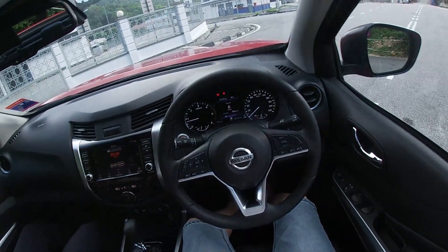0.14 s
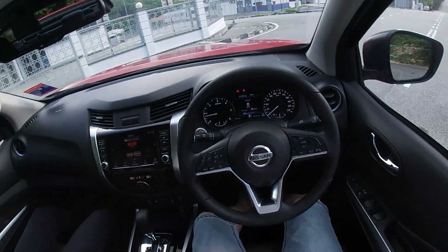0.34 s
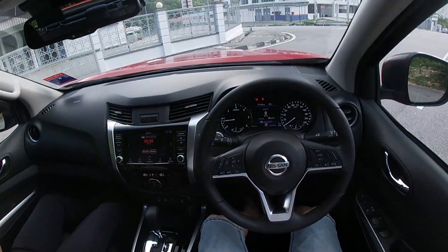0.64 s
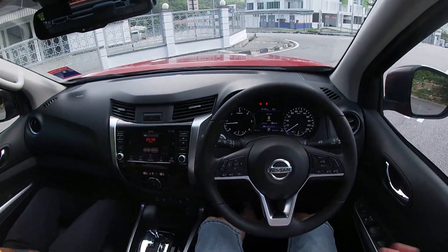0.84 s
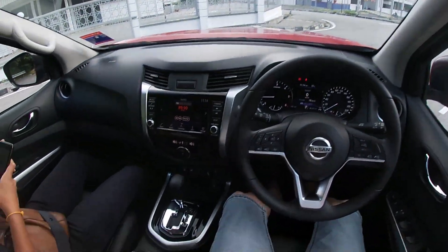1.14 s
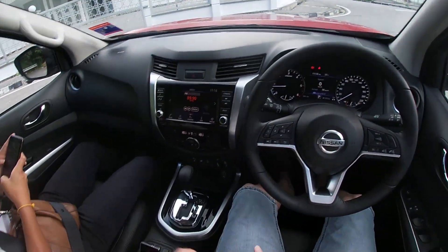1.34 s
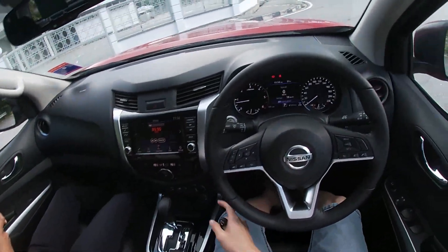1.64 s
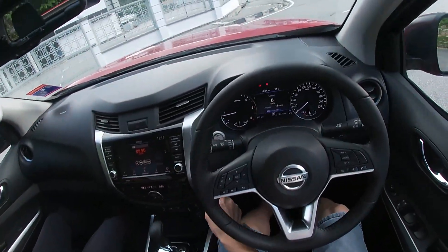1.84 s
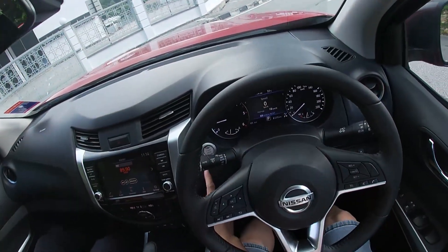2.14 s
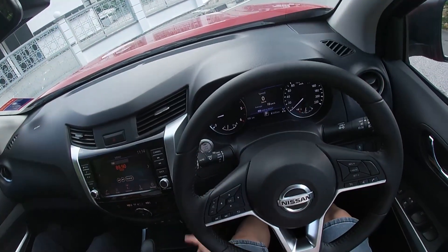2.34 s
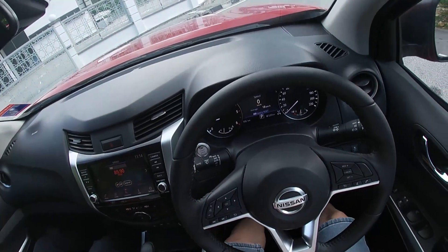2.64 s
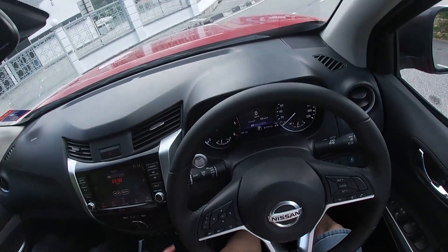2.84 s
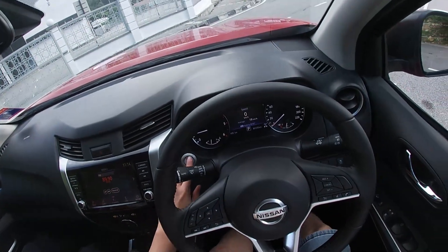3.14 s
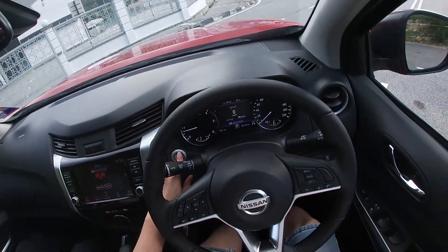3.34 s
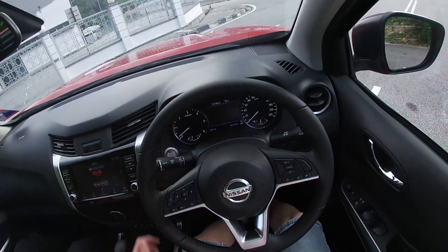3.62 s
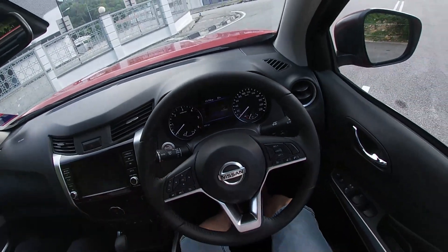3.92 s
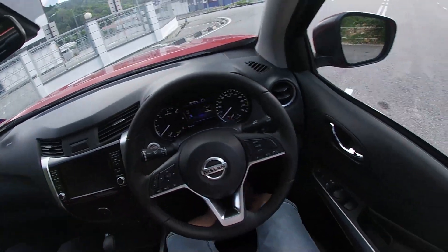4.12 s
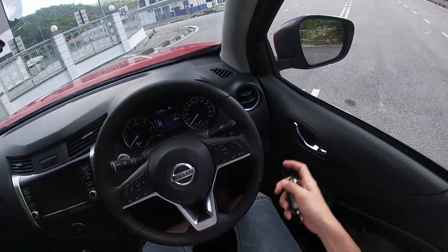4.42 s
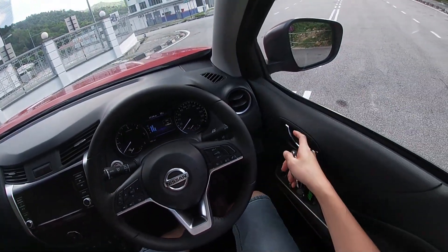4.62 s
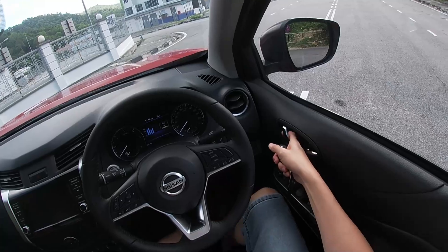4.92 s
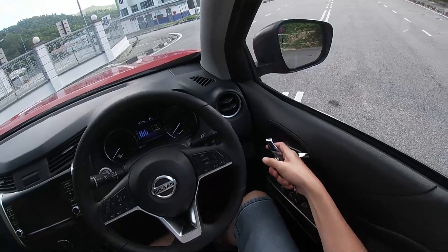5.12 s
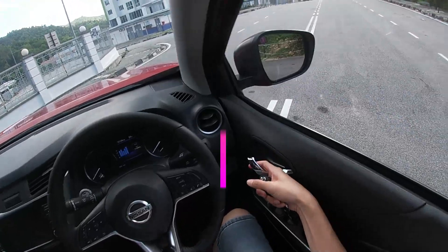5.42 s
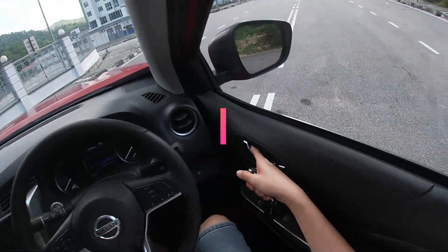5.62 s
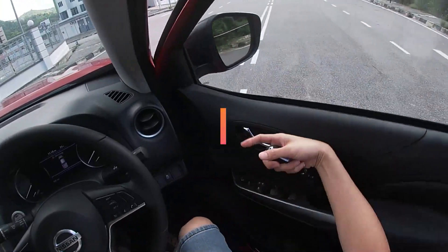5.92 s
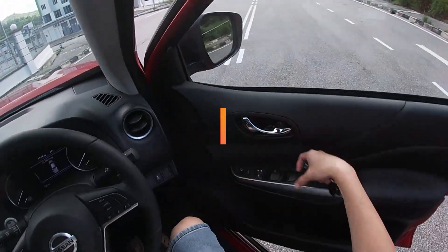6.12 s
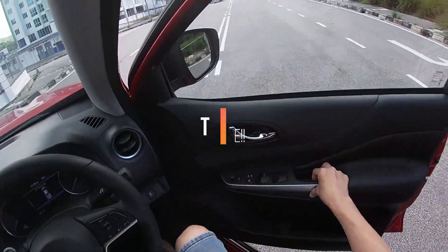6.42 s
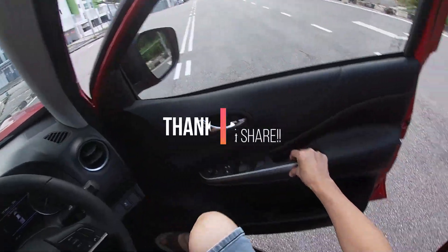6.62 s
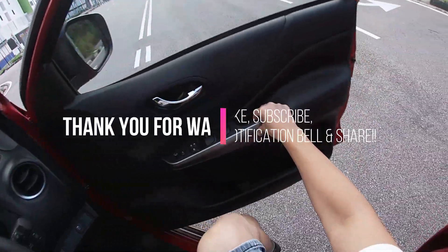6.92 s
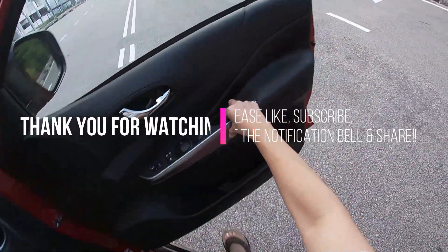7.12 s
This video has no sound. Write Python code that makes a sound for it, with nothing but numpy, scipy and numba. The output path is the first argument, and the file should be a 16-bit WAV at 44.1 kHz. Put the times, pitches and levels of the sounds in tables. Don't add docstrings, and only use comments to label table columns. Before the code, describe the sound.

A low diesel idle hums under clicks and shifter knocks, stops, then a door thuds open with a brief hinge squeak and wind.

```python
import sys
import numpy as np
from scipy import signal
from scipy.fft import rfft, irfft, next_fast_len
from scipy.io import wavfile
from scipy.ndimage import uniform_filter1d
from numba import njit

SR = 44100
rng = np.random.default_rng(int(sys.argv[2]) if len(sys.argv) > 2 else 0)


def transcribe(signal):
    frames = np.atleast_2d(signal).T
    limited = np.clip(frames, -1, 1)
    pcm = np.round(limited * 32767).astype(np.int16)
    wavfile.write(sys.argv[1], SR, pcm)


def boost_factor(decibels):
    exponent = np.asarray(decibels, float) / 20
    return 10 ** exponent


N = 320607


def level(x, db):
    return x * boost_factor(db) / np.sqrt(np.mean(x ** 2))


def curves(table):
    s, *columns = np.transpose(table)
    t = np.arange(N) / SR
    inside = 1. * ((t >= s[0]) & (t <= s[-1] + 1 / SR))
    return [np.interp(t, s, c) for c in columns], uniform_filter1d(inside, 800)


@njit
def resonance(x, hz, width):
    y, b, l = np.empty(len(x)), 0., 0.
    g, k = np.tan(np.pi * hz / SR), width / hz
    for i in range(len(x)):
        v = (b + g * (x[i] - l)) / (1 + g * (g + k))
        b = 2 * v - b
        l = l + 2 * g * v
        y[i] = k * v
    return y


def colour(x, points):
    hz, db = np.transpose(points)
    n = next_fast_len(2 * len(x))
    gain_db = np.interp(np.log(np.fft.rfftfreq(n, 1 / SR) + 1), np.log(hz), db)
    cep = irfft(gain_db * np.log(10) / 20, n)
    cep[1:n // 2] *= 2
    cep[n // 2 + 1:] = 0
    return irfft(rfft(x, n) * np.exp(rfft(cep)), n)[:len(x)]


def band(lo_hz, hi_hz, n=N):
    sos = signal.butter(2, [lo_hz, hi_hz], "bandpass", fs=SR, output="sos")
    return level(signal.sosfilt(sos, rng.standard_normal(n)), 0)


def walk(rate):
    k = int(SR / rate)
    return level(uniform_filter1d(np.repeat(rng.standard_normal(N // k + 1), k), k)[:N], 0)


def add(out, s, x):
    i = int(s * SR)
    out[i:i + len(x)] += x[:N - i]


def swell(start, length, attack, release):
    t = np.arange(N) / SR - start
    return boost_factor(20 * np.minimum(np.minimum(t / attack, (length - t) / release), 0))


def ring_down(t, t60):
    return np.exp(-np.log(1000) * t / t60)


def struck(t, t60, rise_s):
    return ring_down(t, t60) * (1 - np.exp(-t / rise_s))


def sine(hz, t):
    return np.sin(2 * np.pi * hz * t)


# frequency in Hz, density in dB per Hz.
TOP_SPECTRUM = [(7000, -40), (9000, 0.5), (11000, -6.5), (13000, -15.5), (15500, -21)]


def top_air(db):
    return level(colour(rng.standard_normal(N), TOP_SPECTRUM), db)


# time in seconds, twice the firing rate in Hz, cabin boom in dB.
IDLE = [
    (0.0, 51.08, -27),
    (0.34, 50.84, -26.5),
    (1.8, 50.85, -29),
    (2.2, 50.34, -37),
    (3.61, 50.25, -36),
    (3.76, 51.6, -32),
    (3.86, 50.85, -52),
]
# multiple of the firing rate, level in dB.
BODY_ORDERS = [(1, -1.5), (2, -2.5), (3, 0), (4, -12.5), (5, -19), (6, -26), (7, -10.5), (8, -29),
               (9, -36.5), (10, -33.5), (11, -43), (12, -35.5), (13, -45.5), (14, -29.5)]
CYLINDER_DB = [0.4, -1, 0.76, -1.1]
# frequency in Hz, width in Hz.
MOUNT_BANDS = [(110, 83)]
# frequency in Hz, density in dB per Hz.
CLATTER_SPECTRUM = [(53, -41), (90, -2.5), (183, -9), (274, -18), (306, -13), (328, -23), (572, -21.5),
                    (810, -29.5), (2500, -42.5), (3250, -56), (5500, -120)]
# frequency in Hz, width in Hz, level in dB.
DASH_MODES = [(550, 160, -9.5), (1239, 26, -8.5), (760, 47, -10)]


def engine():
    (boom_hz, boom_db), on = curves(IDLE)
    off_s = np.maximum(np.arange(N) / SR - 3.61, 0)
    hum_db = -34.5 - 110 * off_s
    clatter_db = -46.5 - 80 * off_s
    turn = np.cumsum(np.r_[np.full(SR, boom_hz[0]), boom_hz] / 2 / SR) + 0.21
    fired = np.flatnonzero(np.diff(np.floor(turn)))
    uneven_db = 0.95 * rng.standard_normal(N // 500)[:len(fired)]
    pulses = np.zeros(N + SR)
    pulses[fired] = boost_factor(np.resize(CYLINDER_DB, len(fired)) + uneven_db)

    orders = [(24.93 * k, db) for k, db in BODY_ORDERS]
    hum = colour(pulses, [(18.6, -31.0)] + orders + [(900, -71.5), (4000, -130), (20000, -190)])
    for hz, width in MOUNT_BANDS:
        hum = hum - 2 * resonance(hum, 1. * hz, 1. * width)
    boom = resonance(resonance(pulses, 48.65, 4.5), 50.4, 6.4)

    burst = 3.0 + np.exp(-(turn[SR:] % 1) / 0.96)
    hiss = colour(burst * rng.standard_normal(N), CLATTER_SPECTRUM)
    dash = sum(level(resonance(hiss, 1. * f, 1. * w), db) for f, w, db in DASH_MODES)
    clatter = level(hiss, 0) + 0.16 * dash

    out = level(hum[SR:], 1.74) * boost_factor(hum_db)
    out = out + level(boom[SR:], -0.28) * boost_factor(boom_db)
    return on * (out + level(clatter, 5.1) * boost_factor(clatter_db))


# frequency in Hz, density in dB per Hz.
CLOTH_SPECTRUM = [(820, -33), (1300, -0.5), (1570, -3), (2220, -6.5), (2950, -3), (3430, -4), (4200, -6),
                  (4960, -4.5), (6220, -4.5), (6810, -5), (8470, -14.5), (11000, -32), (18600, -120)]
# start in seconds, length in seconds, level in dB.
RUBS = [(0, 0.04, -64.5), (0.191, .45, -66.5), (0.795, 0.044, -54), (0.904, 0.043, -65.5),
        (0.993, 0.074, -53.5), (1.13, 0.058, -70), (1.36, 0.28, -64.5), (1.727, 0.38, -63),
        (2.15, 0.41, -68), (3.945, 0.32, -75.5), (4.362, 0.23, -68), (4.728, 0.51, -65.5),
        (5.87, 0.11, -66)]
# start in seconds, length in seconds, level in dB.
STROKE = [
    (2.58, 0.523, -56),
]


def rustle():
    touch = boost_factor(-67) * swell(0, 6.16, 1, 0.022)
    touch = touch + sum(boost_factor(db) * swell(s, hold, 0.046, 0.052) for s, hold, db in RUBS)
    stroke = sum(boost_factor(db) * swell(s, hold, 0.0133, 0.0133) for s, hold, db in STROKE)
    cloth = colour(rng.standard_normal(N) * boost_factor(1.1 * walk(60)), CLOTH_SPECTRUM)
    patches = np.zeros(N)
    for hz in 1493.0 * 1.3 ** np.arange(7):
        patches += boost_factor(3 * walk(12)) * resonance(resonance(cloth, hz, 0.47 * hz), hz, .5 * hz)
    hiss = level(cloth, -1.9) + level(patches, -7.5) + top_air(-23)
    thin = hiss - 0.39 * resonance(hiss, 1500.0, 1700.0)
    return touch * hiss + stroke * thin


# start in seconds, length in seconds, start pitch in Hz, end pitch in Hz, level in dB.
WHINES = [(.265, .08, 1050, 950, -52.5), (1.02, .06, 3240, 3370, -57), (3.535, .03, 1445, 1390, -50),
          (3.78, 0.081, 1340, 1300, -70), (3.924, .025, 1490, 1406, -49), (3.924, 0.014, 4530, 4410, -56),
          (5.075, 0.023, 785, 820, -55), (5.572, 0.088, 419, 488, -49), (5.63, .065, 558, 600, -52),
          (6.18, .035, 420, 378, -45.5), (6.222, .07, 689, 669, -52.5), (6.275, .06, 1950, 1910, -59),
          (6.22, 0.05, 3410, 3370, -60), (6.385, 0.022, 4900, 4850, -58), (5.475, 0.044, 658, 649, -48.5),
          (5.475, 0.027, 1390, 1360, -53), (6.345, .02, 3700, 3700, -48), (5.905, .06, 2600, 2950, -62)]
# start in seconds, length in seconds, start pitch in Hz, end pitch in Hz, level in dB.
SCUFFS = [(.085, .03, 320, 300, -44), (1.122, .04, 850, 1050, -42), (3.69, .08, 350, 220, -48),
          (1.025, .055, 1300, 1700, -50), (1.155, .04, 3500, 5000, -54), (3.515, .045, 7400, 8100, -64),
          (3.592, 0.028, 7600, 7300, -64), (3.622, 0.026, 7200, 6100, -55), (3.52, .04, 4500, 4000, -60),
          (3.66, 0.046, 2200, 2800, -46), (5.112, .045, 1300, 1100, -50), (5.185, .05, 1300, 1450, -56),
          (5.285, .05, 500, 800, -42), (5.115, 0.059, 420, 380, -45), (6.176, .04, 1500, 1300, -51),
          (5.735, 0.058, 400, 520, -42), (2.58, .17, 5200, 4800, -60.5), (2.79, .18, 5200, 7000, -60.5),
          (2.95, .06, 3600, 3500, -60.5), (3.0, .11, 7000, 7500, -59), (3.03, .075, 9800, 10000, -80),
          (2.6, .12, 3200, 3100, -63), (.03, .025, 4800, 4500, -42), (1.15, .045, 9000, 9500, -66),
          (4.235, .04, 400, 300, -48), (4.365, .05, 420, 300, -44), (3.93, .14, 800, 700, -62),
          (3.555, .04, 6500, 6000, -62), (5.69, .04, 700, 600, -52)]


def slides():
    out = np.zeros(N)
    for rows, width in (WHINES, .08), (SCUFFS, .7):
        for start, length, start_hz, end_hz, db in rows:
            n = int(length * SR)
            chance = rng.standard_normal((3, SR // 4))
            k = max(int(SR / (width * start_hz)), 2)
            a, b = uniform_filter1d(uniform_filter1d(chance[:2], k, axis=1), k, axis=1)[:, :n]
            rough = uniform_filter1d(uniform_filter1d(chance[2], 90), 90)
            grain = boost_factor(4.0 * level(rough, 0)[:n])
            phase = 2 * np.pi * np.cumsum(np.linspace(start_hz, end_hz, n)) / SR
            rub = a * np.cos(phase) + b * np.sin(phase)
            add(out, start, level(rub * grain * np.hanning(n) ** 0.55, db))
    return out


# time in seconds, peak in dB, ring in Hz, body part in dB.
BRAKE = [
    (.0309, -18.5, 3000, 7.5),
    (.0792, -42, 2140, 9),
    (.0917, -31, 2100, -18),
    (.3774, -26, 2680, 5.5),
]
SHIFTER = [
    (.823, -41, 6460, 10),
    (.8462, -18, 3400, -29),
    (.8819, -27.5, 3000, 11.5),
    (.9702, -26, 3460, -21),
    (.9909, -25.5, 2130, 1),
    (1.0844, -23, 2590, 11),
    (1.1506, -32.5, 6170, 7),
    (1.1675, -31, 2880, -11.5),
    (1.1782, -31.5, 3470, -12),
    (1.281, -48.5, 2330, 5),
]
BUCKLE = [
    (1.4076, -30, 3160, -12),
    (1.565, -29, 3050, -24),
    (1.5962, -32, 2810, -16),
    (1.6267, -49, 3340, -17),
    (1.6464, -39, 3200, -9),
    (1.7498, -33, 7000, -15.5),
    (2.2268, -47, 2709, 9.5),
    (2.4858, -41.5, 5400, -15),
]
SWITCH = [(3.3612, -37.5, 6340, 2), (3.5267, -40, 7260, 2), (3.544, -39, 1500, 6), (3.593, -47, 8100, -10),
          (3.623, -31, 3280, 0), (3.6454, -31.5, 2200, 7), (3.6727, -25.5, 2440, 7.5),
          (3.6827, -28, 1997, -6.5), (3.925, -32.5, 1450, 0), (4.127, -43.5, 3070, 5),
          (4.5421, -41.5, 2630, 4.5)]
HANDLE = [(5.0737, -41.5, 2800, 3), (5.1038, -39, 2160, 4), (5.1183, -29, 2327, -1), (5.193, -37, 2150, 1),
          (5.2666, -32, 2570, 15), (5.3158, -36, 2600, 0), (5.477, -26, 7400, -6), (5.693, -44, 2020, 10),
          (5.7457, -35.5, 5470, -0.5), (5.8701, -35, 2200, -1), (5.9503, -40, 2510, 1)]
STAY = [
    (6.1486, -38.5, 2640, -23),
    (6.1779, -33.5, 2600, 9),
    (6.222, -39, 3392, 6.5),
    (6.3321, -29.5, 1920, -9.5),
    (6.353, -25, 3660, 8),
]
# the clicks of a part, its body resonance in Hz, its top part in dB.
PARTS = [(BRAKE, 960, -5.5), (SHIFTER, 510, -6.5), (BUCKLE, 610, -15),
         (SWITCH, 670, -10.5), (HANDLE, 780, -12), (STAY, 540, -40)]


def clicks():
    out, t = np.zeros(N), np.arange(SR // 5) / SR
    n = len(t)
    fade = ring_down(t, 0.062) + 0.97 * np.exp(-t / 0.0019)
    for rows, body_hz, top_db in PARTS:
        for s, db, hz, body_db in rows:
            ring = level(resonance(rng.standard_normal(n), 1. * hz, 0.098 * hz), -4.0)
            ring = ring + 0.41 * band(1600, 4900, n)
            body = level(resonance(rng.standard_normal(n), 1. * body_hz, 0.28 * body_hz), -5.0)
            body = body + .5 * band(450, 1600, n)
            edge = band(5050, 7130, n) + 0.13 * band(8000, 15000, n)
            add(out, s, boost_factor(db - 11.0) * fade * (ring + boost_factor(body_db) * body + boost_factor(top_db) * edge))
    return out


def dull_top(sharp):
    dull = signal.sosfilt(signal.butter(4, 8300, fs=SR, output="sos"), sharp)
    return dull + boost_factor(-18) * resonance(resonance(sharp, 11500., 5000.), 11500., 5000.)


# time in seconds, peak in dB, ring in Hz.
TAPS = [
    (.031, -8, 960),
    (.378, -29, 925),
    (.883, -17, 630),
    (1.083, -9, 600),
    (5.846, -24, 820),
    (5.858, -25.5, 776),
    (5.871, -31.5, 1000),
    (5.886, -25, 764),
    (5.9, -19.5, 610),
]


def taps():
    out, t = np.zeros(N), np.arange(SR // 20) / SR
    fade = struck(t, .016, .0006)
    for s, db, hz in TAPS:
        add(out, s, boost_factor(db + 3.0) * fade * (sine(hz, t) + 0.29 * sine(1.556 * hz, t)))
    return out


# time in seconds, peak in dB, ring in Hz.
CABIN_THUDS = [(.034, -22, 179), (.841, -32, 102.4), (.884, -12, 188), (.885, -16, 275), (1.085, -16, 280),
               (1.083, -6, 162), (1.123, -12.5, 128.9), (2.227, -26.5, 189.5), (2.245, -22, 146),
               (3.355, -37, 103), (3.645, -26.5, 145), (3.681, -24.5, 186), (3.686, -15.5, 104),
               (3.712, -25, 178), (3.74, -25.5, 106), (4.135, -33, 146), (4.238, -30, 189),
               (4.367, -20.5, 175), (4.725, -32, 96)]
# time in seconds, peak in dB, ring in Hz.
DOOR_THUDS = [(5.078, -23, 105), (5.12, -30, 121), (5.188, -31.5, 280), (5.266, -6.5, 104.4),
              (5.27, -9, 275), (5.281, -9, 278), (5.295, -16, 300), (5.309, -9.5, 99), (5.473, -32, 154),
              (5.741, -18.5, 100.6), (5.758, -12.5, 100), (5.777, -23, 99), (5.939, -20, 101),
              (5.999, -32, 98), (6.178, -39, 203), (6.347, -29, 211)]
# time in seconds, peak in dB, ring in Hz.
DETENT = [
    (5.842, -5, 101.3),
    (5.856, -6, 270),
    (5.866, -8, 178),
    (5.879, -3.5, 232),
    (5.898, -4.5, 124),
]


def thuds():
    out, t = np.zeros(N), np.arange(SR // 3) / SR
    for rows, t60 in (CABIN_THUDS, 0.096), (DOOR_THUDS, 0.094), (DETENT, 0.041):
        for s, db, hz in rows:
            low = sine(hz, t) + .5 * sine(1.45 * hz, t) + 0.2 * sine(0.99 * hz, t)
            add(out, s, boost_factor(db) * struck(t, t60, 0.0023) * low)
    return out


# ratio to the ring, level in dB.
HOLLOW = [(1, 2.5), (0.69, -3), (1, -5), (1.4, -6.5), (2.2, -20)]
# time in seconds, peak in dB, ring in Hz.
RAPS = [(.036, -31, 399), (0.84, -37, 380), (.884, -19, 445), (1.083, -21.5, 445), (2.227, -35.5, 384.3),
        (3.357, -32, 343), (3.645, -33, 400), (3.68, -30, 430), (4.135, -43.5, 354), (4.313, -39.5, 545),
        (5.078, -38, 298), (5.121, -38, 341), (5.27, -16, 447), (5.288, -22, 347), (5.48, -41, 679),
        (5.741, -34, 323), (6.182, -44, 391.2), (6.346, -36, 297)]


def raps():
    out, t = np.zeros(N), np.arange(SR // 3) / SR
    for s, db, hz in RAPS:
        upper = np.zeros(len(t))
        for ratio, ratio_db in HOLLOW:
            detune, lift = rng.standard_normal(2)
            upper += boost_factor(ratio_db + 2.0 * lift) * sine(hz * ratio * (1 + 0.029 * detune), t)
        add(out, s, boost_factor(db) * struck(t, 0.086, 0.0023) * upper)
    return out


# start in seconds, end in seconds, level in dB, slips per second,
# then the modes of the part, each with frequency in Hz, width in Hz and level in dB.
CREAKS = [
    (.140, 0.199, -39, 900, [(1080, 170, 0), (1545, 130, -0.5), (2346, 154, -3), (3360, 390, -14.5)]),
    (5.262, 5.325, -46, 1500, [(1290, 720, 5.5), (2800, 1250, -3)]),
    (3.64, 3.71, -39, 500, [(600, 590, 4), (1280, 530, -1.5), (2270, 1800, -7)]),
    (.99, 1.09, -49, 700, [(1240, 650, 1), (2200, 1200, -9)]),
    (1.095, 1.17, -46.5, 1500, [(1000, 620, 5), (2300, 2100, -11)]),
    (.77, .85, -47.5, 800, [(694, 560, 9), (1500, 650, -19), (3000, 460, 0)]),
]


def creaks():
    out = np.zeros(N)
    for start, end, db, rate, modes in CREAKS:
        n = int((end - start) * SR)
        chance = rng.random((SR // 4, 2))
        slips = (chance[:n, 0] < rate / SR) * (.3 + chance[:n, 1]) * np.hanning(n) ** .4
        slips = np.r_[slips, np.zeros(800)]
        ring = np.zeros(len(slips))
        for f, w, g in modes:
            ring += boost_factor(g) * resonance(resonance(slips, 1. * f, 1. * w), 1. * f, 1.65 * w) / w
        add(out, start, level(ring, db))
    return out


# time in seconds, heave in dB, panels in dB,
# decay in seconds per 20 dB.
PUSHES = [(3.72, -31, -41.5, 0.6), (4.1, -43, -45, 0.47), (4.44, -31.5, -47.5, 0.1), (4.78, -70, -50, 2.5),
          (5.071, -55, -37.5, 0.5), (5.19, -46, -45, 0.26), (5.257, -41, -40.5, 0.38),
          (5.33, -19.5, -57, 0.15), (5.72, -42, -35.5, 0.3), (5.78, -20, -42, 0.17),
          (5.826, -21, -42.5, 0.15), (6.0, -34, -56, 0.04)]
# time in seconds, level in dB.
GUSTS = [
    (6.3, -48),
    (6.5, -38),
    (6.68, -40.5),
    (6.78, -35),
    (6.93, -32.5),
    (7.075, -34.5),
    (7.2, -32.5),
    (7.251, -32.5),
]


def rocking():
    shapes = [swell(s, 0, 0.042, decay) for s, _, _, decay in PUSHES]
    sway = sum(boost_factor(row[1]) * shape for row, shape in zip(PUSHES, shapes))
    drum = sum(boost_factor(row[2]) * shape for row, shape in zip(PUSHES, shapes))
    gust = sum(boost_factor(db) * swell(s, 0, 0.082, 0.11) for s, db in GUSTS)
    (gap_db,), open_ = curves(STREET)
    rest = swell(3.72, 4, .02, 1)
    heave = band(21.8, 51.0) * (boost_factor(-56.5) * rest + sway)
    heave = heave + band(25, 88) * boost_factor(33) * gust ** 2.06
    panels = level(resonance(band(62, 200), 133.0, 150.), -2.9) * boost_factor(1.2 * walk(25))
    panels = panels * (boost_factor(-54.5) * rest + drum + gust + open_ * boost_factor(gap_db - 6.0))
    trim = level(resonance(band(237, 1840), 300.0, 290.0), -3.43) * boost_factor(3.3 * walk(30))
    trim = trim * (boost_factor(-64) * rest + boost_factor(-24) * drum + open_ * boost_factor(gap_db + 6))
    return heave + panels + trim


# start in seconds, end in seconds, start pitch in Hz, end pitch in Hz, level in dB, wobble as a share.
SQUEAKS = [
    (3.86, 4.36, 18.5, 15, -27, .03),
    (3.92, 4.14, 40, 36, -32, .03),
    (4.16, 4.42, 28, 31, -28, .03),
    (6.9, 6.95, 3000, 2500, -60, .01),
    (4.38, 4.48, 84, 82, -36, .01),
    (6.9, 7.27, 11650, 11660, -100, .0004),
]


def squeaks():
    out = np.zeros(N)
    for start, end, start_hz, end_hz, db, wobble in SQUEAKS:
        n = int((end - start) * SR)
        hz = np.linspace(start_hz, end_hz, n) * (1 + wobble * walk(86)[:n])
        tone = np.sin(2 * np.pi * np.cumsum(hz) / SR)
        add(out, start, boost_factor(db + 2.9 * walk(50)[:n]) * np.hanning(n) ** 0.35 * tone)
    return out


# time in seconds, level in dB, pitch in Hz with the sign of the first push, decay in seconds per 60 dB.
SEAL = [
    (5.262, -12, -26, .1),
    (5.281, -9, 8.5, 1.0),
    (5.817, -8, -42, .12),
]


def air_swings():
    out, t = np.zeros(N), np.arange(SR // 2) / SR
    for s, db, hz, t60 in SEAL:
        add(out, s, boost_factor(db) * sine(hz, t) * ring_down(t, t60))
    return out


# time in seconds, level in dB.
STREET = [
    (6.1, -70),
    (6.14, -66),
    (6.2, -55),
    (6.3, -59.5),
    (6.335, -48),
    (6.42, -54.5),
    (6.508, -52),
    (7.27, -46.5),
]
# frequency in Hz, density in dB per Hz.
AIR_SPECTRUM = [(530, -32), (900, -20.5), (1010, -11), (1140, -1.5), (1230, -5), (1490, -7.5), (1610, -3.5),
                (2070, -4.5), (2650, -2), (3100, -2.5), (4430, -8.5), (5820, -10.5), (6640, -21.5),
                (8470, -28.5), (11000, -51), (18600, -120)]


def street():
    (db,), on = curves(STREET)
    traffic = level(colour(rng.standard_normal(N), AIR_SPECTRUM), 0.83)
    return on * (traffic + top_air(-28)) * boost_factor(db + walk(10))


# multiple of the hinge pitch, level in dB.
HINGE_PARTIALS = [(1, -52), (3, -57), (5, -59), (7, -62), (15, -79)]


def hinge():
    out, start, end = np.zeros(N), 6.205, 6.345
    n = int((end - start) * SR)
    hz = np.linspace(678, 660, n) * (1 + .004 * walk(60)[:n])
    phase = 2 * np.pi * np.cumsum(hz) / SR
    note = sum(boost_factor(db + 2 * walk(40)[:n]) * np.sin(k * phase) for k, db in HINGE_PARTIALS)
    add(out, start, np.hanning(n) ** .3 * note)
    return out


def cabin_echo(hits):
    t = np.arange(SR // 5) / SR
    echo = band(290, 6100, len(t)) * ring_down(t, 0.066) * (t > .002)
    return boost_factor(-10) * signal.fftconvolve(hits, echo / np.sqrt(np.sum(echo ** 2)))[:N]


def scene():
    hits = dull_top(clicks()) + thuds() + raps() + creaks() + squeaks() + air_swings() + hinge()
    steady = rustle() - engine() + rocking() + street()
    return (steady + taps() + slides() + hits + cabin_echo(hits))[None]


def low_pass(x):
    return signal.sosfilt(signal.butter(12, 15100, fs=SR, output="sos"), x)


def record(dry):
    limit = 0.55
    dry = dry - uniform_filter1d(dry, SR // 3, axis=1)
    return low_pass(limit * np.tanh(dry / limit))


dry = scene()
out = record(dry)
transcribe(out)
```